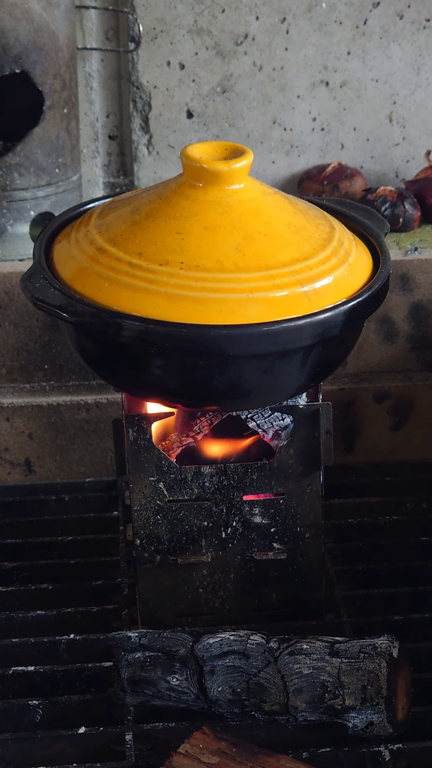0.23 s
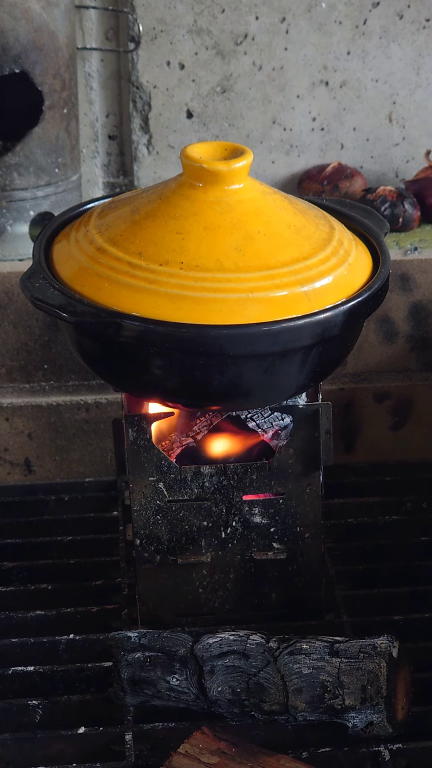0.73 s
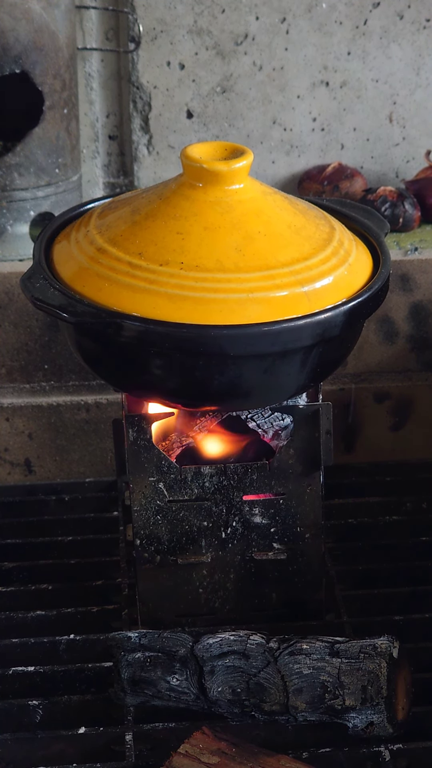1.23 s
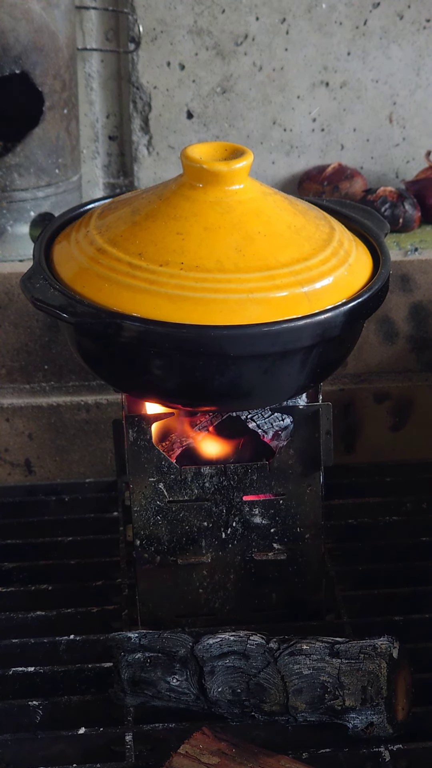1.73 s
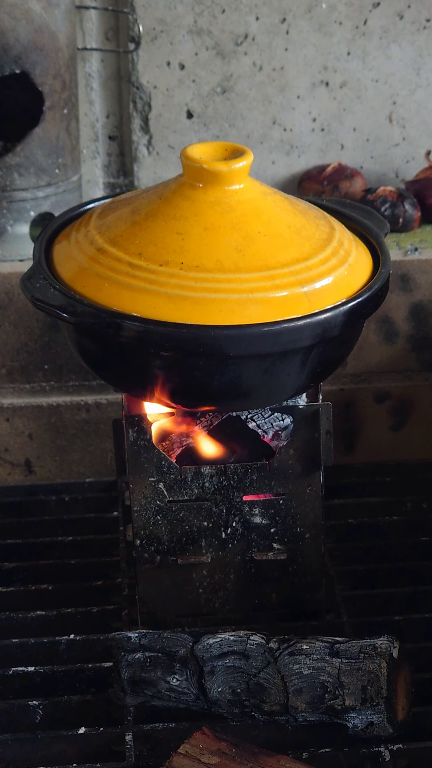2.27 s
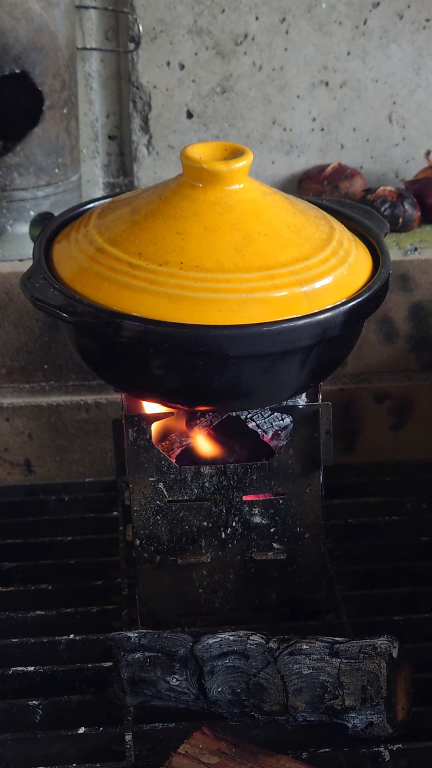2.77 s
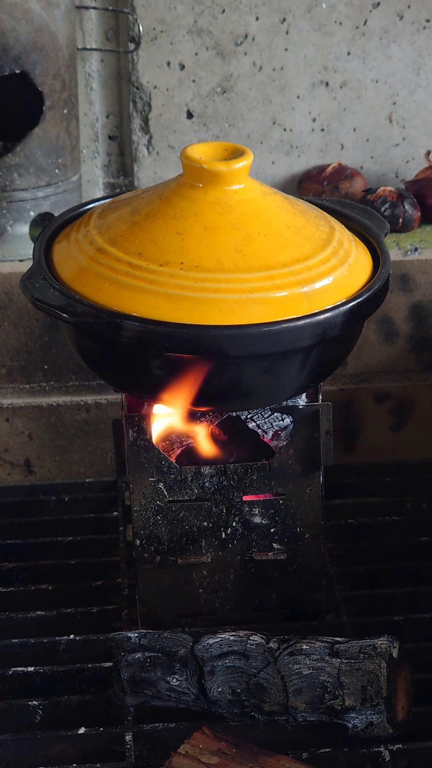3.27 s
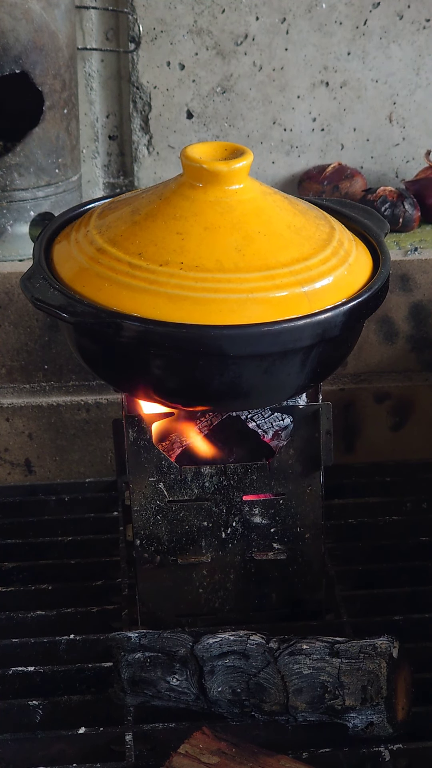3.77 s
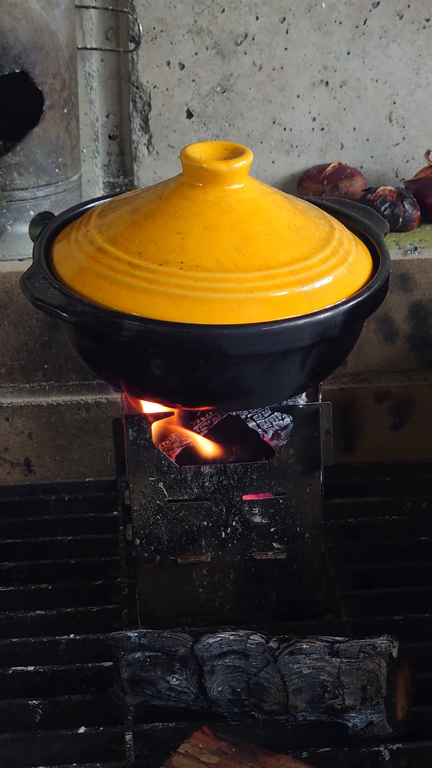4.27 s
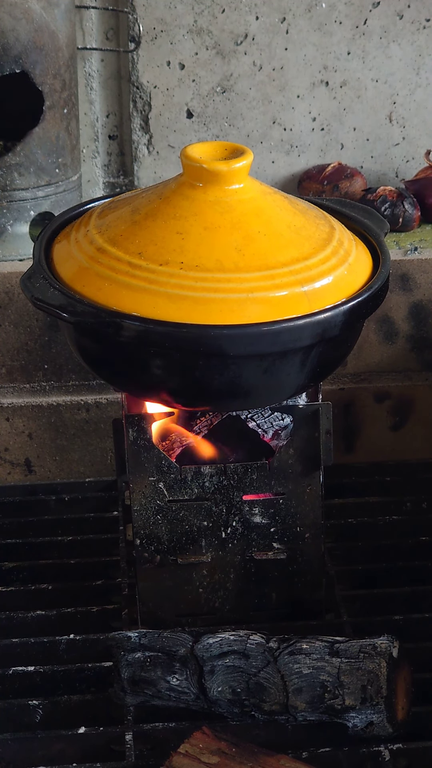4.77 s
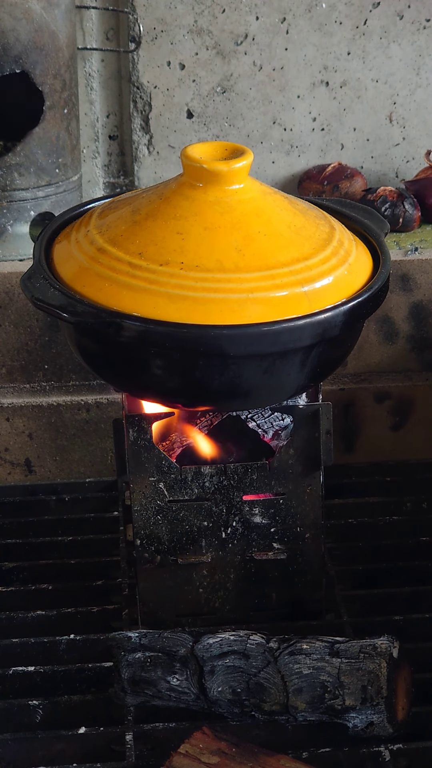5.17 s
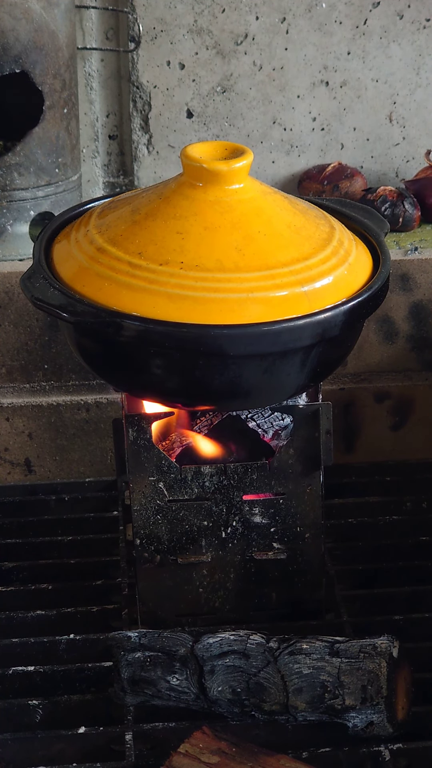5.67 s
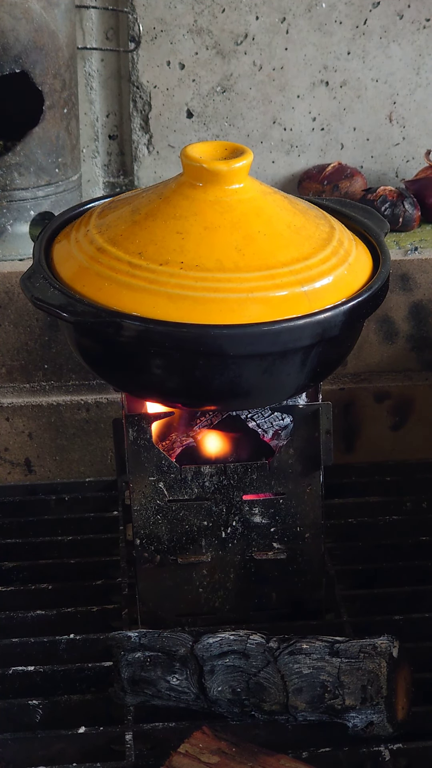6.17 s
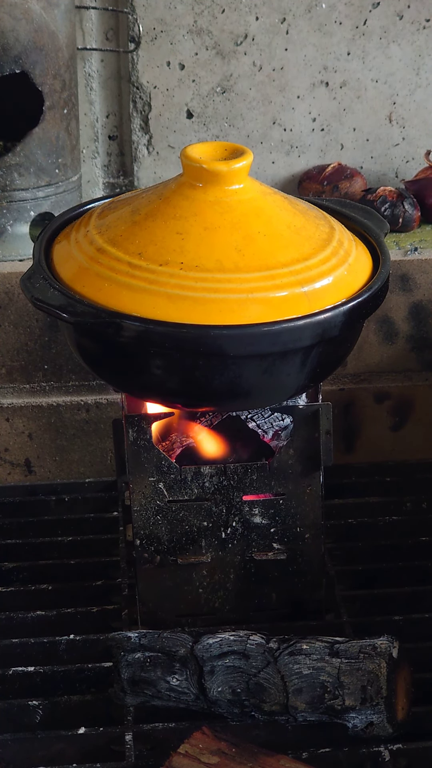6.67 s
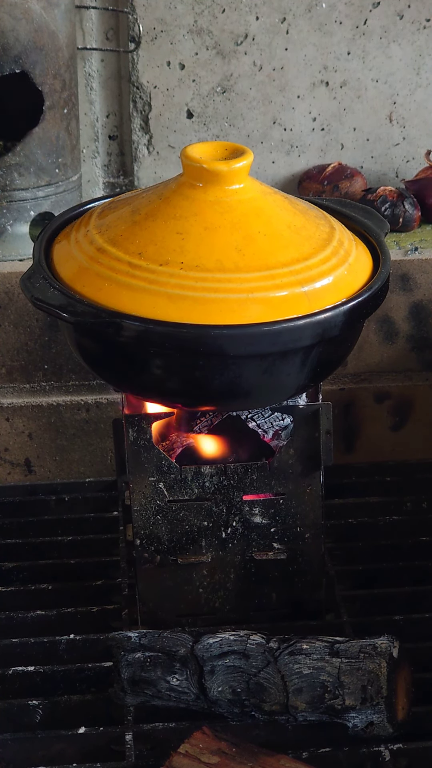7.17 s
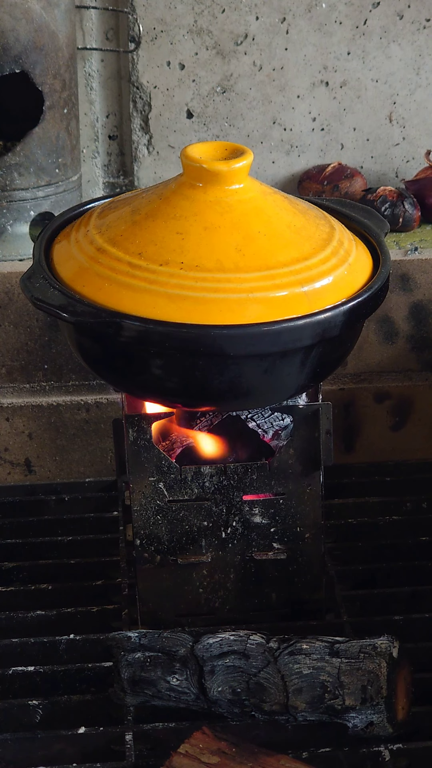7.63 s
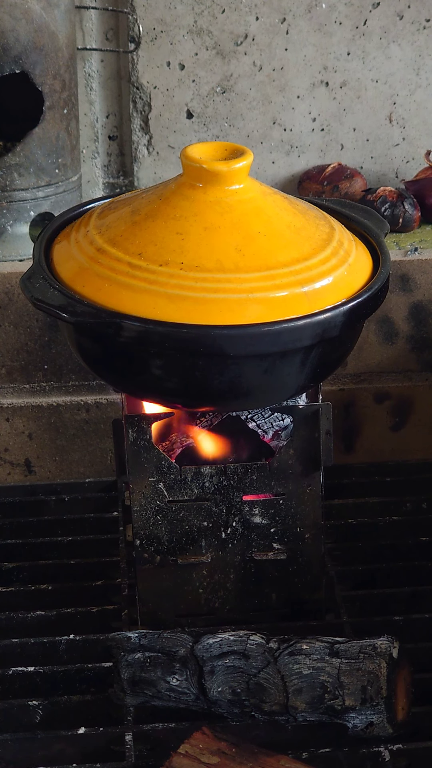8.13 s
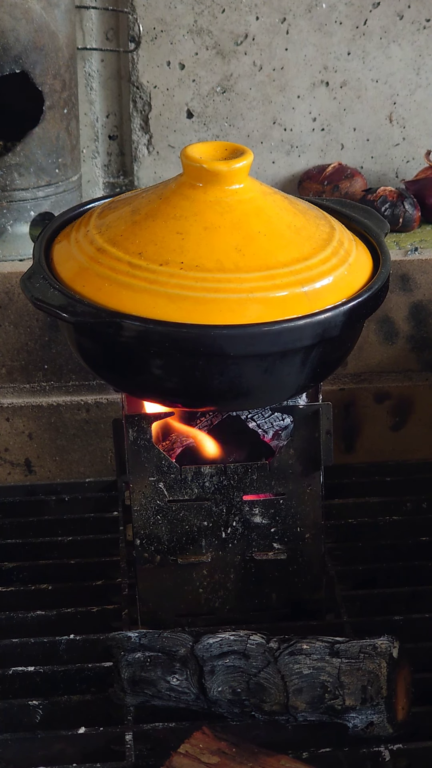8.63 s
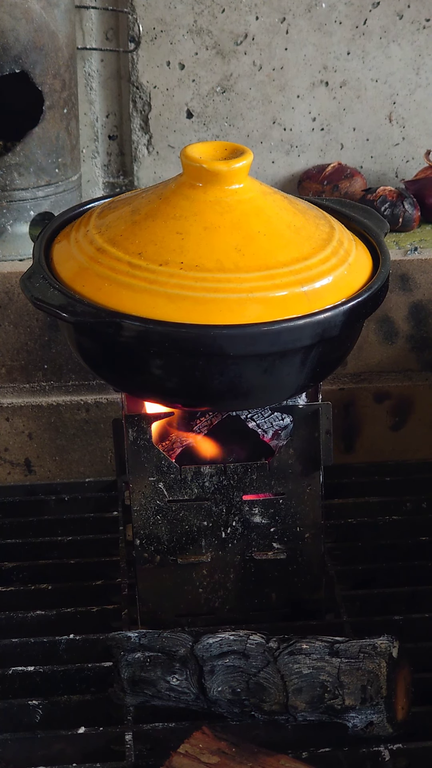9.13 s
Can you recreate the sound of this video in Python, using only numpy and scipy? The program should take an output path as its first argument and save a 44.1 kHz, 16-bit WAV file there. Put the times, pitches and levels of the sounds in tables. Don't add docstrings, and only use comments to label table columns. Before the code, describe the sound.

Close to a small charcoal stove, embers snap and a lidded pot bubbles very quietly over faint room air and motor hum. To one side, someone rummages through charcoal, drops big lumps with deep thuds and clatter, scrapes a ringing metal scoop, and pours smaller pieces in two dry, hissing bursts. Hard walls smear the blows; the end settles to tiny clinks and bubbles.

```python
import sys
import numpy as np
from scipy import signal
from scipy.fft import rfft, irfft, next_fast_len
from scipy.io import wavfile
from scipy.ndimage import uniform_filter1d

SR = 44100
rng = np.random.default_rng(int(sys.argv[2]) if len(sys.argv) > 2 else 0)


def digitize_waveform(pressure):
    field = np.atleast_2d(pressure).T
    bounded = np.clip(field, -1, 1)
    quanta = np.round(bounded * 32767).astype(np.int16)
    wavfile.write(sys.argv[1], SR, quanta)


def convert_level_to_amplitude(level_db):
    exponent = np.asarray(level_db, float) / 20
    return 10 ** exponent


N = 414540
HZ = np.fft.rfftfreq(next_fast_len(N), 1 / SR)


def evened(x):
    return x / np.sqrt(np.mean(x ** 2) + 1e-20)


def read(points, hz):
    f, value = np.transpose(points)
    return np.interp(np.log(hz + 1), np.log(f + 1), value)


def coloured(x, gain):
    size = next_fast_len(N)
    return irfft(rfft(x, size) * gain, size)[..., :N]


def above(edge_hz):
    return 1 / (1 + (edge_hz / (HZ + 1)) ** 10)


def add(mix, s, sound):
    part = mix[round(s * SR):][:len(sound)]
    part += sound[:len(part)]


def rings(rows, rise):
    out = np.zeros(N)
    for s, hz, db, t60 in rows:
        t = np.arange(round(t60 * SR)) / SR
        tone = np.sin(2 * np.pi * hz * t) * (1 - np.exp(-t / rise))
        add(out, s, convert_level_to_amplitude(db + 4 - 60 * t / t60) * tone)
    return out


def paired(x):
    # f/Hz, left-right likeness/1
    likeness = [(60, .97), (150, .97), (300, .88), (600, .5), (1100, 0), (16000, 0)]
    same = np.clip(read(likeness, HZ), -1, 1)
    return np.array([x[0], coloured(x[0], same) + coloured(x[1], np.sqrt(1 - same ** 2))])


def walls(x, direct_db, lag=6):
    # f/Hz, t60/s
    wall_decay = [(100, 0.66), (500, 0.41), (2000, 0.28), (6000, 0.36), (15000, 0.13)]
    taps = np.zeros((2, SR))
    at = np.arange(200, SR - 10, 10) + rng.integers(0, 10, (2, (SR - 201) // 10))
    np.put_along_axis(taps, at, rng.choice([-1., 1.], at.shape), 1)
    hz, t, z = signal.stft(taps, SR, nperseg=256)
    dying = convert_level_to_amplitude(-60 * t / read(wall_decay, hz)[:, None])
    tail = signal.istft(z * dying, SR, nperseg=256)[1]
    tail = tail / np.linalg.norm(tail[0])
    wet = paired(signal.fftconvolve(x[None], tail, axes=1)[:, :N])
    return wet + convert_level_to_amplitude(direct_db) * np.array([np.roll(x, round(lag)), x])


def boom(damping, modes_db):
    # f/Hz, level/dB, t60/s
    shed_modes = [(104.6, -9, 0.28), (142, -3, 0.77), (185.5, -2.5, 0.46), (223.3, -8, 0.58),
                  (333.2, -9, 0.64), (400, -9.5, 0.24), (492, -12.5, 0.28), (557, -8.5, 0.2),
                  (655, -11, 0.46), (845, -12, .25)]
    modes = sum(convert_level_to_amplitude(db) / (1 + 2j * (HZ - f) * t60 / damping) for f, db, t60 in shed_modes)
    return 1 + convert_level_to_amplitude(modes_db) * modes


def air():
    # f/Hz, level per Hz/dB
    air_colour = [(25, -24), (48, -4.5), (87, -7.5), (123, -10.5), (160, -19.5), (285, -9.5), (451, -7.5),
                  (530, -2.5), (624, -6.5), (1230, -14.5), (2000, -20.5), (4000, -32), (9000, -42),
                  (16000, -28)]
    hum_hz, hum_waver = 56, 0.013
    drift = evened(uniform_filter1d(rng.standard_normal(N), 4000))
    hum = np.sin(2 * np.pi * np.cumsum(hum_hz * (1 + hum_waver * drift)) / SR)
    wide = coloured(paired(rng.standard_normal((2, N))), convert_level_to_amplitude(read(air_colour, HZ)))
    return convert_level_to_amplitude(-58) * evened(wide) + convert_level_to_amplitude(-63.5) * hum


def simmer(per_s=25, spread_db=4, level_db=-72):
    # t/s, level/dB, f/Hz
    big_bubbles = [
        (0.194, -46, 548),
        (6.347, -54, 500),
        (6.404, -47, 520),
        (7.713, -57, 520),
        (7.877, -42, 555),
        (8.873, -44, 490),
        (9.036, -46, 545),
        (9.273, -46, 518),
    ]
    draws = rng.random((600, 4))[:round(per_s * N / SR)]
    small = [(s * N / SR, 470 + 170 * p, level_db - spread_db * np.log(e + 0.021), 0.089 + 0.063 * d)
             for s, p, e, d in draws]
    big = [(s, hz, db - 10.5, .1) for s, db, hz in big_bubbles]
    return rings(small + big, 0.0027)


def ticks():
    # t/s, peak level/dB
    embers = [(3.5123, -27), (3.8445, -36.5), (4.3375, -47), (4.7168, -39.5), (4.806, -38), (4.818, -55),
              (8.8007, -47), (0.68, -46), (4.671, -54), (4.787, -60), (7.9495, -34), (8.1025, -24),
              (8.1325, -20), (8.3553, -27)]
    out, t = np.zeros(N), np.arange(800) / SR
    decay = np.exp(-t / .0007) + .25 * np.exp(-t / .004)
    for (s, db), burst in zip(embers, rng.standard_normal((len(embers), len(t)))):
        snap = burst * decay
        add(out, s, convert_level_to_amplitude(db + 4) * snap / abs(snap).max())
    return signal.lfilter(*signal.butter(4, 7400 / SR * 2, "high"), out)


def scoop():
    # t/s, f/Hz, level/dB
    main_ring = [
        (5.031, 1440, -47),
        (5.048, 1414, -61),
        (5.065, 1400, -44.5),
        (5.088, 1420, -40.5),
        (5.112, 1420, -51),
        (5.135, 1420, -44),
        (5.153, 1425, -56),
                 (5.167, 1426, -43),
        (5.182, 1420, -50),
        (5.2, 1413, -35),
        (5.22, 1416, -38),
        (5.236, 1428, -52),
        (5.258, 1420, -42),
        (5.295, 1414, -48),
        (5.345, 1420, -72),
        (5.38, 1420, -59.5),
    ]
    # t/s, f/Hz, level/dB, t60/s
    partials = [
        (5.085, 5020, -64.5, 1.4),
        (5.27, 5040, -66, .9),
        (5.228, 4075, -57, .12),
        (5.2, 2638, -62, .6),
        (5.03, 5000, -64, .2),
        (5.09, 2600, -58, 0.7),
        (5.175, 4150, -65, 1.0),
        (5.21, 8160, -75, 0.86),
    ]
    s, hz, db = np.transpose(main_ring)
    t = np.arange(N) / SR
    turn = 2 * np.pi * np.cumsum(np.interp(t, s, hz)) / SR
    strength = convert_level_to_amplitude(np.interp(t, s, db, -120, -120) + 7.5)
    rubbed = strength * np.array([convert_level_to_amplitude(2) * np.sin(turn), convert_level_to_amplitude(-2) * np.sin(turn + .8)])
    beat = 1 + .2 * np.sin(2 * np.pi * 23 * t)
    return rubbed + rings(partials, .004) * beat


def splintered(rows, late_s=.012, spread=.004, count=4):
    luck = rng.uniform(-1, 1, (len(rows), count, 2))
    return [(s + late_s * abs(a) * (k > 0), hz * (1 + spread * b * (k > 0)), db - 5 - 2 * (k > 0), t60)
            for (s, hz, db, t60), parts in zip(rows, luck) for k, (a, b) in enumerate(parts)]


def clinks():
    # t/s, f/Hz, level/dB, t60/s
    struck = [(1.24, 143.2, -49.5, 0.93), (1.3, 125, -60, .3), (2.36, 1032, -39, 0.19),
              (2.52, 2004, -34, 0.51), (2.53, 101.4, -33, 0.29), (2.55, 3490, -34, 0.29),
              (2.67, 4856, -22.5, 0.13), (3.1, 4500, -42.5, 0.23), (3.62, 1073, -56, 0.32),
              (4.13, 873, -46, 0.13), (5.042, 2370, -34, 0.054), (5.84, 181.7, -44.5, 0.29),
              (5.84, 4200, -41, 0.19), (6.92, 1068, -44.5, .5), (6.93, 4730, -29, .14),
              (7.09, 1078, -56, 0.47), (7.2, 2617, -48, 0.87), (7.755, 1216, -48, 0.11),
              (8.17, 9670, -30.5, 0.29), (8.195, 12700, -30, 0.26), (8.22, 3640, -57, 0.18),
              (8.33, 3661, -46, 0.11), (9.385, 1116, -45.5, 0.24), (9.389, 201, -46, .18),
              (9.388, 495, -43, 0.26), (2.858, 401.5, -23.5, .2), (5.172, 4081, -60, .15),
              (4.38, 4500, -57, .3), (2.853, 342, -27, 0.23), (2.86, 655, -29.5, 0.25),
              (2.885, 542, -31, 0.18), (2.92, 144.4, -27, 0.42), (2.95, 666, -43, .2),
              (5.031, 1010, -43, 0.084), (5.031, 2290, -46, 0.18), (5.033, 4258, -57, .12),
              (5.085, 2566, -46, .2), (5.11, 2430, -52, .2), (5.157, 1026, -43, 0.16),
              (5.157, 1520, -46, .08), (5.033, 3700, -60, .1), (4.668, 4060, -61, 0.19),
              (8.355, 3830, -47, 0.15)]
    # t/s, f/Hz, level/dB
    chips = [(2.6, 5670, -29), (2.67, 9900, -39), (2.725, 13800, -30), (2.74, 8500, -35),
             (2.862, 9920, -22.5), (2.869, 13870, -24), (2.875, 7610, -23), (2.88, 5010, -24),
             (2.98, 8500, -33), (5.175, 11610, -51), (5.175, 10500, -56), (5.86, 12200, -38),
             (5.97, 9800, -41), (6.1, 9300, -51.5), (6.24, 14900, -48), (6.5, 12600, -48)]
    # t/s, f/Hz, level/dB
    trickle = [(7.95, 8700, -43), (8.021, 9700, -35.5), (8.02, 12740, -39.5), (8.103, 10780, -29),
               (8.11, 14800, -40), (8.11, 15450, -48), (8.13, 7730, -39), (8.14, 9250, -47),
               (8.17, 14800, -26), (8.19, 12110, -30.5), (8.2, 7360, -36), (8.24, 10800, -51.5),
               (8.271, 9820, -39.5), (8.3, 12740, -36), (8.3, 8350, -44.5), (8.355, 14560, -38),
               (8.355, 9060, -45), (8.36, 13900, -42.5), (8.37, 7500, -50)]
    chip_t60_s, trickle_t60_s = 0.14, 0.12
    ringing = struck + [(*chip, chip_t60_s) for chip in chips] + [(*shard, trickle_t60_s) for shard in trickle]
    low = [row for row in ringing if row[1] < 3000]
    high = [row for row in ringing if row[1] >= 3000]
    rattle = convert_level_to_amplitude(4.5 * evened(uniform_filter1d(rng.standard_normal(N), 250)))
    return convert_level_to_amplitude(-4.5) * rattle * (rings(low, 0.0025) + convert_level_to_amplitude(-5) * rings(splintered(high), .002))


def thuds():
    # t/s, peak level/dB, f of the push/Hz
    landings = [(1.192, -49, 210), (2.095, -30.5, 172), (2.347, -30, 570), (2.52, -10.5, 198),
                (2.849, -3, 205), (4.14, -28.5, 200), (4.35, -52, 172), (4.668, -41, 230),
                (4.714, -37, 360), (5.037, -41, 700), (5.157, -44, 800), (5.179, -41, 183),
                (5.86, -45, 181), (9.387, -45, 487)]
    out = np.zeros(N)
    for s, db, hz in landings:
        u = np.arange(3000) / SR * hz
        add(out, s, convert_level_to_amplitude(db - 6.0) * np.sin(2 * np.pi * u) * np.exp(-1.5 * u))
    return signal.lfilter(*signal.butter(3, 85 / SR * 2, "high"), coloured(out, boom(1.7, 13.6)))


def spills():
    # t/s, peak level/dB, length/s
    bursts = [
        (0.32, -38, 0.0075),
        (2.672, -30, 0.0075),
        (5.84, -27, 0.011),
        (6.486, -47, 0.011),
        (6.849, -23, 0.0055),
        (7.827, -34.5, 0.0046),
        (8.105, -38, 0.005),
        (8.134, -37.5, 0.0078),
        (8.354, -45, 0.0072),
    ]
    out, t = np.zeros(N), np.arange(4000) / SR
    for (s, db, length), burst in zip(bursts, rng.standard_normal((len(bursts), len(t)))):
        add(out, s, convert_level_to_amplitude(db + 5) * burst * np.exp(-t / max(length, .001)))
    return signal.lfilter(*signal.butter(2, 1200 / SR * 2, "high"), out)


def swell(s, db, rise, fall):
    bend = .15
    late = np.arange(0, N / SR + .01, .001) - np.c_[s]
    away = np.maximum(-late / np.c_[np.maximum(rise, .001)], late / np.c_[np.maximum(fall, .07)])
    return convert_level_to_amplitude(2 * (np.c_[db] - 20 * away * (1 + bend * np.minimum(away, 9))))


def work():
    # peak t/s, snaps level/dB, 20 dB rise/s, 20 dB fall/s, knock of lumps re snaps/dB
    shovel = [(0.0, -53, .1, 0.13, -1), (0.23, -61, 9, 0.1, -9), (0.36, -54, 0.3, 0.13, -4.5),
              (0.44, -58.5, 0.5, 0.04, -6), (0.7, -55.5, 0.06, 0.7, -9.5), (0.8, -55.5, .1, 0.6, -22),
              (0.9, -52, 0.23, 0.8, -13), (1.03, -54, 0.07, -0.15, -17.5), (1.1, -59.5, 0.1, 0.3, -14),
              (1.2, -49.5, 0, 0.1, -6), (1.292, -46.5, 0.1, 0.16, -4), (1.36, -51.5, 0.04, -0.3, -8.5),
              (1.5, -62, 1, .2, -12), (1.62, -51.5, -0.26, 0, -6.5), (1.72, -51, .3, 0.4, -20),
              (1.825, -47, .12, .2, -15), (1.9, -46, .15, .2, -10), (2.01, -39, 0.3139, 0.18, -1.5),
              (2.2, -62, -0.5, -0.3, -7), (2.36, -42, 0.18, 0.34, 1), (2.533, -33, 0.06, 0.34, 3),
              (2.82, -37.5, 0.62, 0.085, -6), (2.888, -27, 0.01, 0.1565, -3.5),
              (3.008, -35.5, -0.03, 0.16, -2.5), (3.25, -56, 9, 0.73, -4), (3.652, -45, .13, 0.1756, -11),
              (3.82, -64, 3, 1, -9), (4.1, -66, 0.3, 0.7, -3), (4.18, -49, 0.09, 0.16, -3),
              (4.39, -53, 0.11, 0.26, 1.5), (4.48, -54, 0.1, 0.11, -15)]
    pours = [(5.62, -63, 0.22, 0.4, -3), (5.77, -74.5, 0, 9, 2), (5.873, -35.5, 0.0774, 0.33, -4),
             (5.972, -38.5, 0.15, 0.34, -8), (6.14, -45, 0.22, -0.24, -5.5), (6.27, -55, -0.07, 0.5, -11),
             (6.54, -53, -0.03, 0.7, -13.5), (6.81, -40.5, 0.19, 0.4, -4),
             (6.927, -29.5, 0.0951, 0.16, -7.5), (7.217, -41.5, 0.1, 0.25, -10.5),
             (7.3, -50.5, 0, 0.04, -23), (7.64, -61.5, 0.3, 0.8, -3), (7.868, -51, 0, 0.77, -5),
             (8.002, -51.5, 0.17, 0.17, -18), (8.153, -43, 0.14, 0.21, -27), (8.37, -58, 1.1, -0.07, -27),
             (8.86, -68, 0.15, 0.25, -4), (9.24, -59.5, 0.22, .6, -3), (9.3, -59, 0.1, 0, -11),
             (9.4, -56, 0.36, .3, -12)]
    scrapes = [
        (5.033, -56, .003, 0.13, 14),
        (5.159, -62, .006, .12, 13),
        (5.19, -59, 0.05, 0.2, 8),
    ]
    # t/s, snaps level/dB, 20 dB fall/s, knock re snaps/dB
    let_go = [(0.321, -55.5, -0.05, -16), (1.19, -57, -0.3, 6), (2.456, -42.5, 0.73, -5),
              (2.855, -33, 0.13, 0), (4.128, -55.5, 0.12, 7.5), (4.347, -60, .15, 3), (4.671, -66, 0.3, 11),
              (5.797, -45.5, 0.45, -2), (6.66, -40, 0.56, -10), (7.753, -45, 0.14, -9.5),
              (7.951, -44, 0.29, -5.5), (8.104, -47.5, 0.1, -24)]
    # t/s, rumble level/dB, 20 dB fall/s
    shakes = [(0.0, -53.5, 0.3), (0.318, -63, 2), (1.19, -55, 2.3), (2.527, -26.5, 0.03),
              (2.858, -19, 0.0373), (2.885, -19.5, 0.08), (3.0, -33, 0.15), (3.2, -50, 1.0),
              (4.128, -45, 0.15), (4.346, -51, 0.4), (4.671, -48.5, 0.17), (5.04, -50.5, -0.1),
              (5.075, -50, 0.3), (5.19, -47.5, 0.19), (5.795, -56.5, 0.6), (6.928, -53.5, 0.8),
              (9.395, -45.5, .1)]
    quickest_rise_s = (.07, .07, .002, .002)
    dust_dbs, carry_dbs = (3, 4.5, 5, -6.5), (-3.5, -17, -11, -8)
    drop_rise_s, shake_rise_s = 0.01, 0.014
    knock_late = 0.86
    rest_db, rest_rumble_db = -80.5, -67.5

    drops = [(s, db, drop_rise_s, fall, knock_db) for s, db, fall, knock_db in let_go]
    s, db, fall = np.transpose(shakes)
    shaking = swell(s, db, shake_rise_s + 0 * s, fall).sum(0)
    rest = convert_level_to_amplitude(2 * np.c_[[rest_db, rest_db + 12, rest_db + 8, rest_rumble_db]])
    total = rest + np.c_[[0, 0, 0, 1]] * shaking
    kinds = (shovel, pours, drops, scrapes)
    for rows, dust_db, carry_db, quickest in zip(kinds, dust_dbs, carry_dbs, quickest_rise_s):
        s, db, rise, fall, knock_db = np.transpose(rows)
        rise = np.maximum(rise, quickest)
        fine = swell(s, db, rise, fall).sum(0)
        lumps = swell(s, db + knock_db, knock_late * rise, fall).sum(0)
        total += [fine, lumps, convert_level_to_amplitude(2 * dust_db) * fine, convert_level_to_amplitude(2 * carry_db) * lumps]
    return 10 * np.log10(total)


def patchy(x, patchy_db):
    z = signal.stft(x, nperseg=512)[2]
    patches = uniform_filter1d(rng.standard_normal(z.shape[1:]), size=4, axis=0)
    patches = uniform_filter1d(patches, size=7, axis=1)
    return signal.istft(z * convert_level_to_amplitude(patchy_db * evened(patches)), nperseg=512)[1][:, :N]


def handling(snaps_per_s=6000, spread_db=2.5):
    # f/Hz, level per Hz/dB
    snap_colour = [(500, 12), (800, -11), (1100, -5.5), (1700, -7), (2600, -6), (4800, -6), (6000, -9.5),
                   (9000, -9.5), (12000, -10), (16000, -6.5)]
    # f/Hz, level per Hz/dB
    rumble_colour = [(50, -44), (90, -20), (200, -1.5), (400, -5.5), (700, -7.5), (1000, -2)]
    size = convert_level_to_amplitude(spread_db * np.minimum(rng.exponential(1, N), 4)) * rng.standard_normal(N)
    snaps = evened(size * (rng.random(N) < snaps_per_s / SR))
    pieces = rng.random((900, 3)) * [N / SR, 14000, 8] + [0, 900, 0]
    shards = rings([(*piece, .07) for piece in pieces], 0.0048)
    heap = evened(walls(snaps + convert_level_to_amplitude(-14) * evened(shards), direct_db=-10))
    heap = heap + convert_level_to_amplitude(-2.0) * paired(rng.standard_normal((2, N)))
    heap = patchy(heap, patchy_db=1.2)

    def layer(db, gain):
        level = convert_level_to_amplitude(np.interp(np.arange(N) / SR * 1000, np.arange(len(db)), db))
        return level * evened(coloured(heap, gain))

    snaps_db, knock_db, dust_db, rumble_db = work()
    snap = convert_level_to_amplitude(read(snap_colour, HZ))
    rumble = convert_level_to_amplitude(read(rumble_colour, HZ)) * boom(10.8, 11.4)
    return (layer(snaps_db + 3.5, snap * (above(2174) - above(6700)))
            + layer(knock_db + 0.5, snap * (above(774) - above(2160)))
            + layer(dust_db + 3, snap * above(6630))
            + layer(rumble_db, rumble * (1 - above(843))))


def scene():
    far = walls(spills() + thuds(), direct_db=-5.0)
    near = walls(clinks() + ticks() + simmer(), direct_db=2.0)
    return air() + scoop() + near + far + handling()


def starved(left, right, mute_db=-20, follow=.9, whim_db=2.5):
    grid = dict(window=signal.windows.cosine(2048), nperseg=2048, noverlap=1024)
    hz, _, z = signal.stft(np.array([left, right]), SR, **grid)
    bands = (abs(z[:, :1024]) ** 2).reshape(2, 64, 16, -1).mean(2)
    whim = evened(uniform_filter1d(rng.standard_normal(bands[0].shape), size=4))
    weak_db = 10 * np.log10(uniform_filter1d(bands[0], size=3) + 1e-16) + whim_db * whim
    strong_db = 10 * np.log10(uniform_filter1d(bands[1], size=9, axis=0) + 1e-16)
    heard = np.repeat(weak_db > follow * strong_db + mute_db, 16, axis=0)
    z[0, :1024] *= heard | (hz[:1024, None] < 5200)
    return signal.istft(z[0], SR, **grid)[1][:N]


def band_limit(x):
    return signal.sosfilt(signal.butter(12, 16660, fs=SR, output="sos"), x)


def record(dry):
    # f/Hz, left minus right level/dB
    port_balance = [(60, 11), (110, 3), (200, -7), (500, -0.5), (4400, -1.5), (5500, -10), (6600, -15),
                    (7200, -11.5), (8200, -13), (8700, -17), (9400, -10), (10600, -8.5), (14400, -13),
                    (16000, -23.5)]
    # f/Hz, level/dB
    body_colour = [(25, -24), (50, -2.5), (5500, -1), (6700, -2.5), (7200, -4), (7600, 5.5), (9500, 2),
                   (11000, 0.5), (15600, -2.5), (15800, -72)]
    ratio = convert_level_to_amplitude(2 * read(port_balance, HZ))
    ports = np.sqrt(2 / (1 + ratio)) * np.array([np.sqrt(ratio), np.ones_like(ratio)])
    left, right = coloured(dry, ports * convert_level_to_amplitude(read(body_colour, HZ)))
    return band_limit(np.array([starved(left, right), right]))


dry = scene()
out = record(dry)
digitize_waveform(out)
```